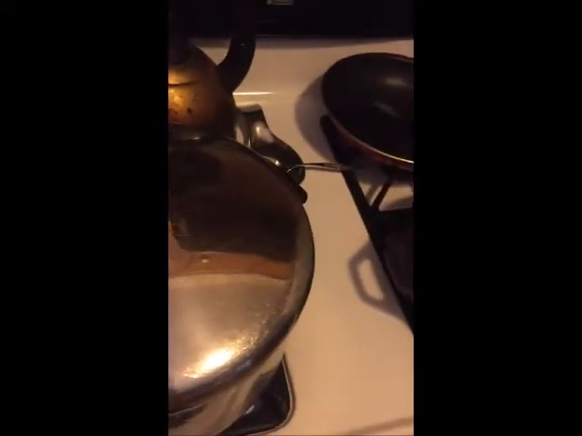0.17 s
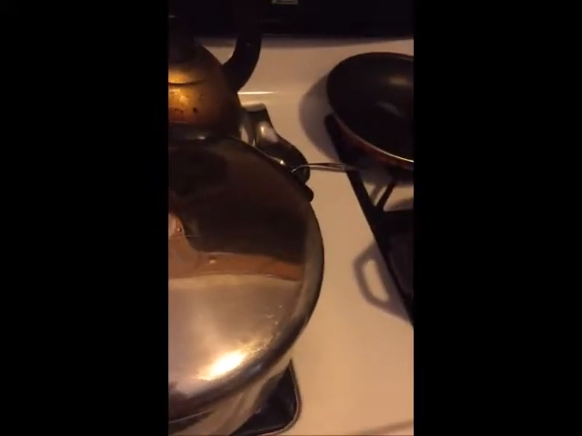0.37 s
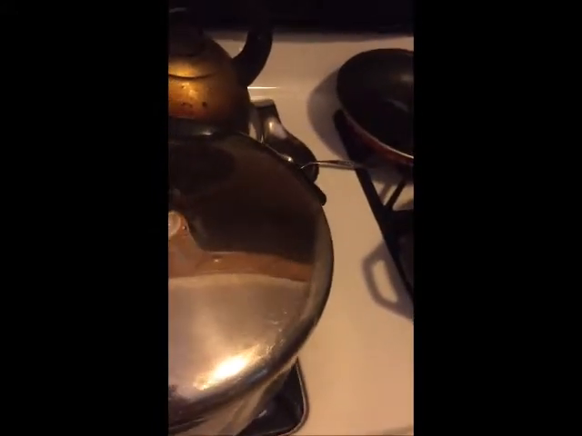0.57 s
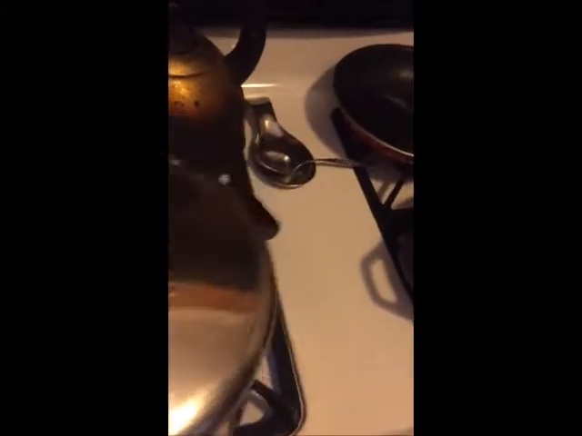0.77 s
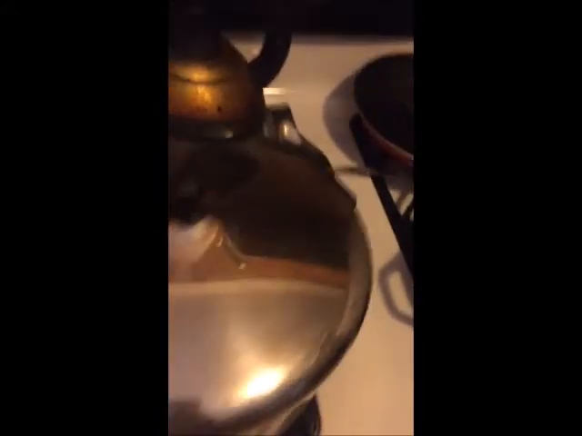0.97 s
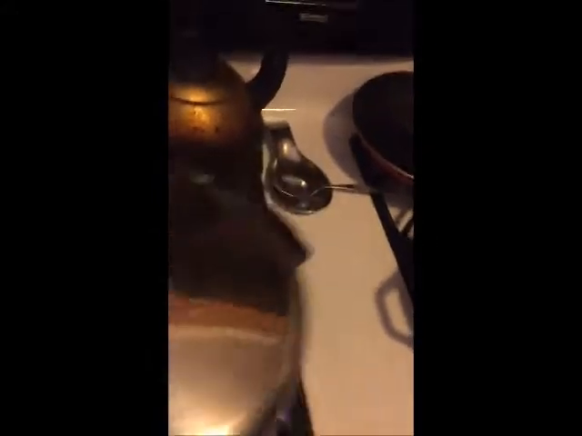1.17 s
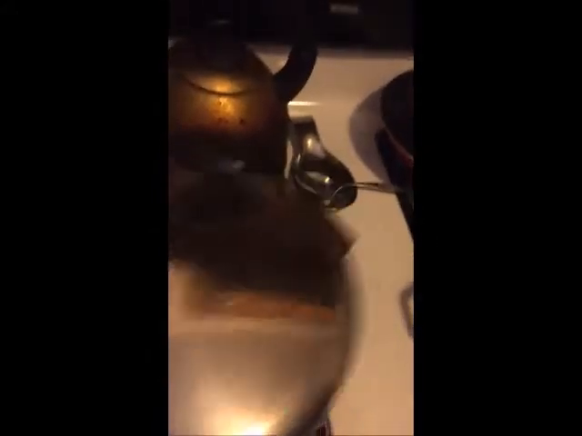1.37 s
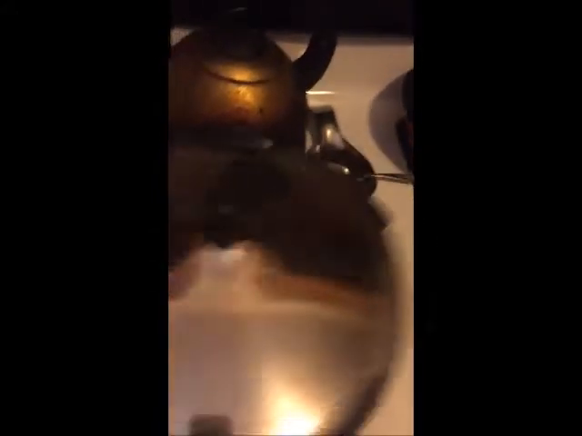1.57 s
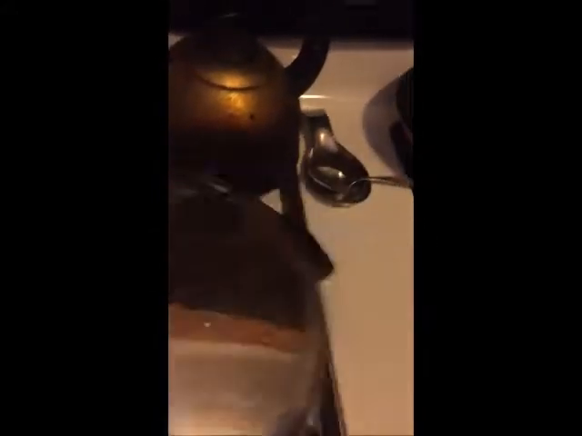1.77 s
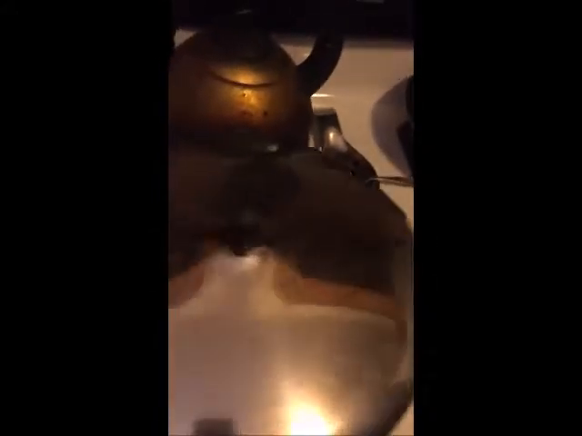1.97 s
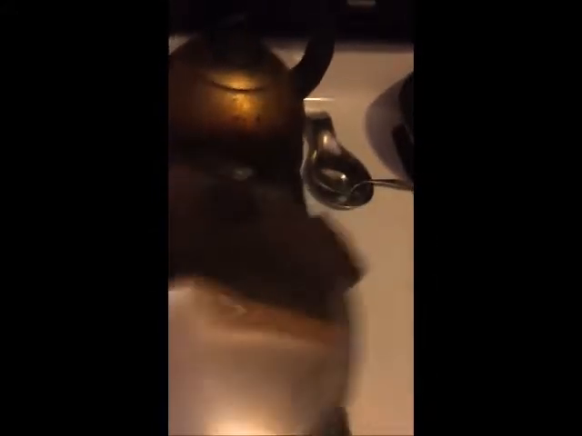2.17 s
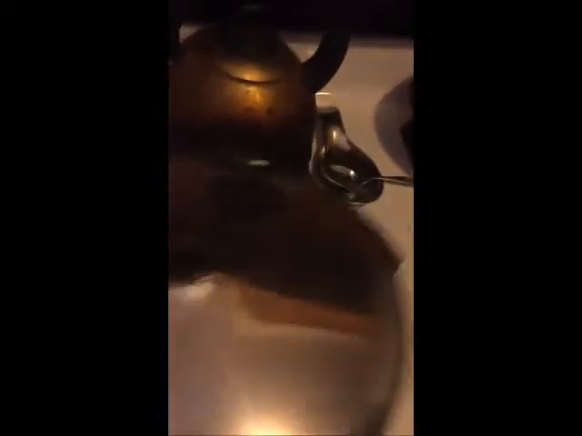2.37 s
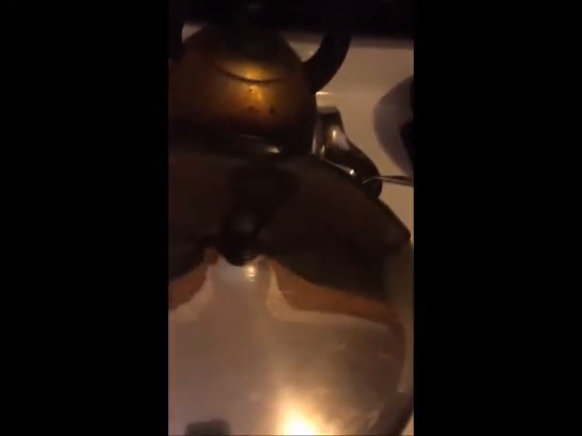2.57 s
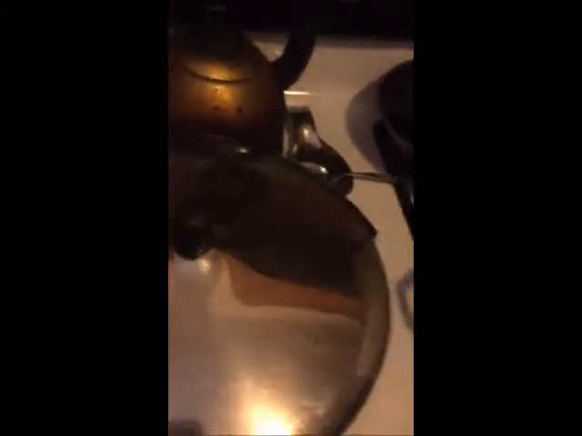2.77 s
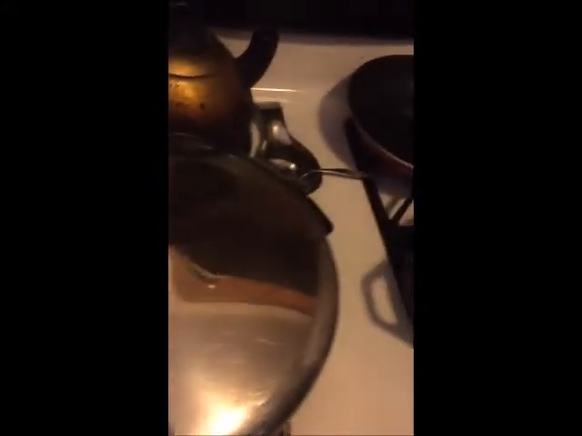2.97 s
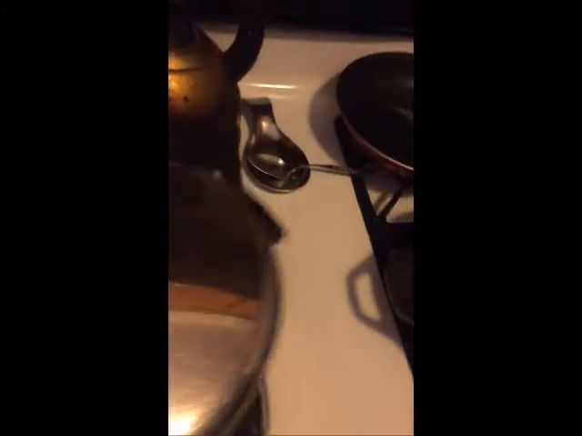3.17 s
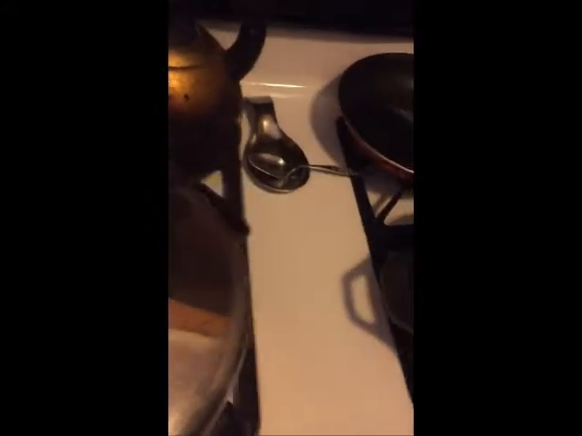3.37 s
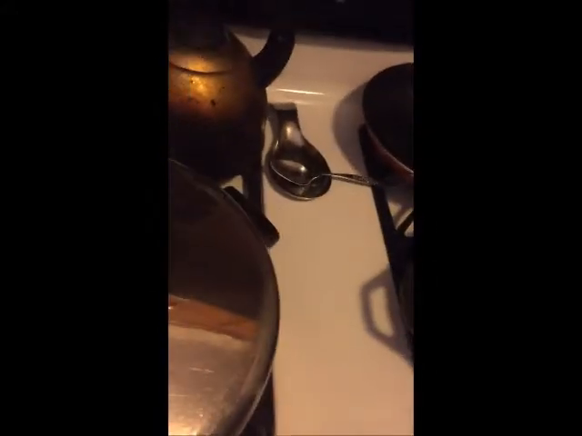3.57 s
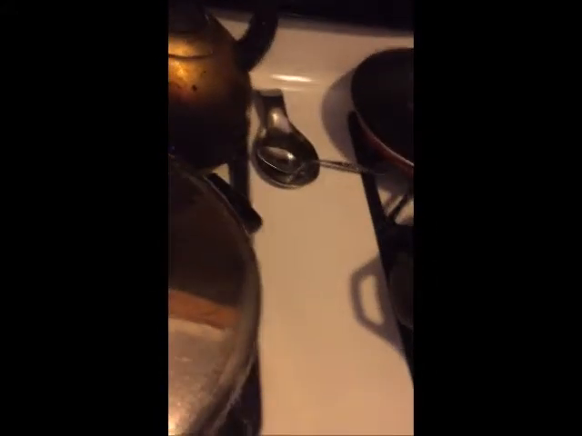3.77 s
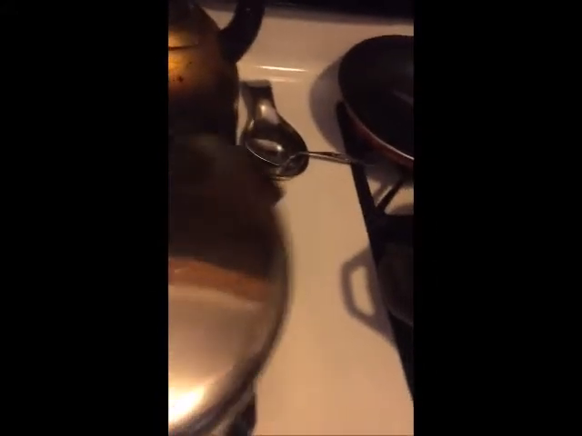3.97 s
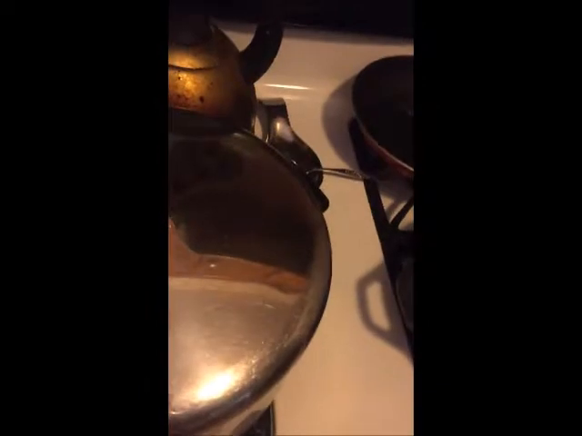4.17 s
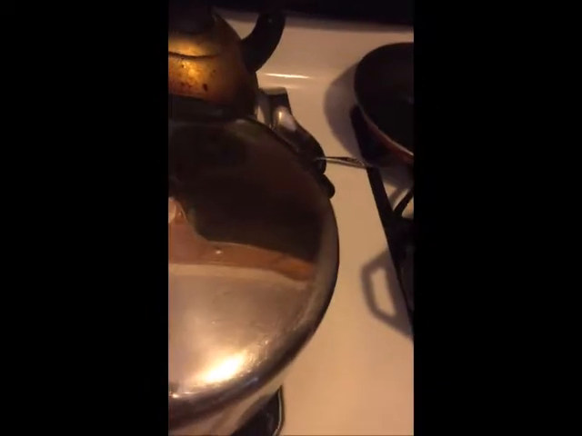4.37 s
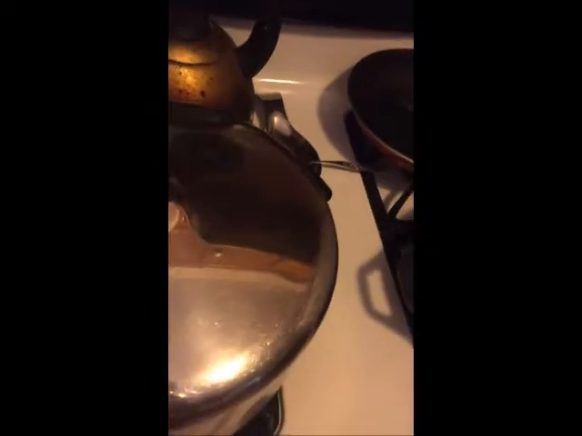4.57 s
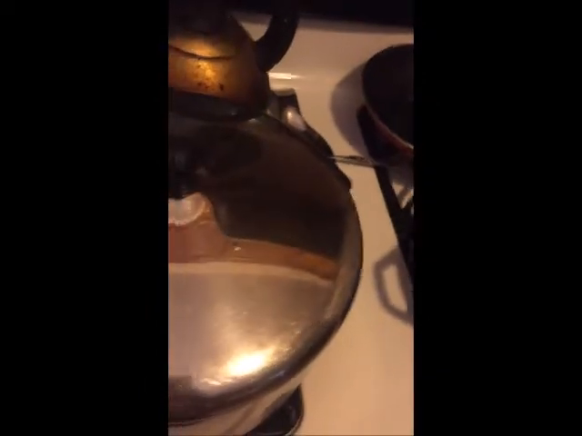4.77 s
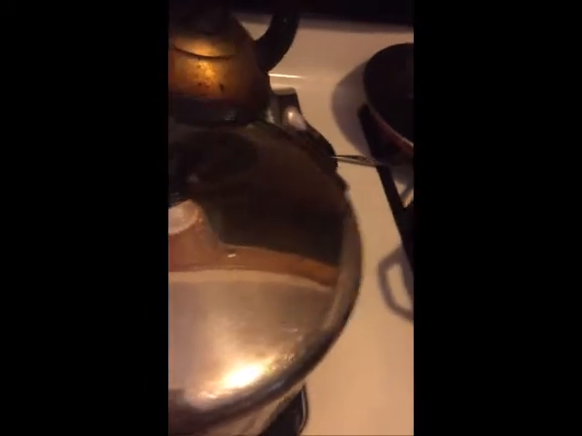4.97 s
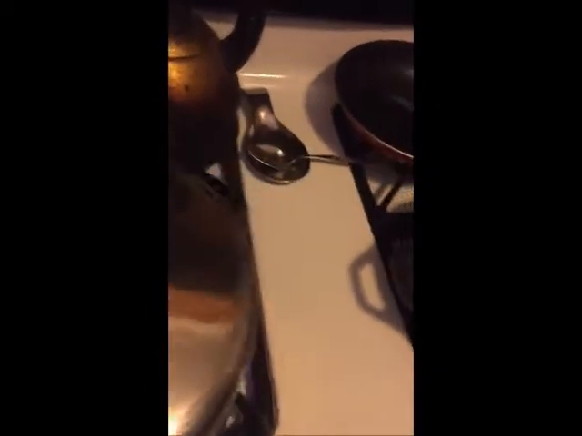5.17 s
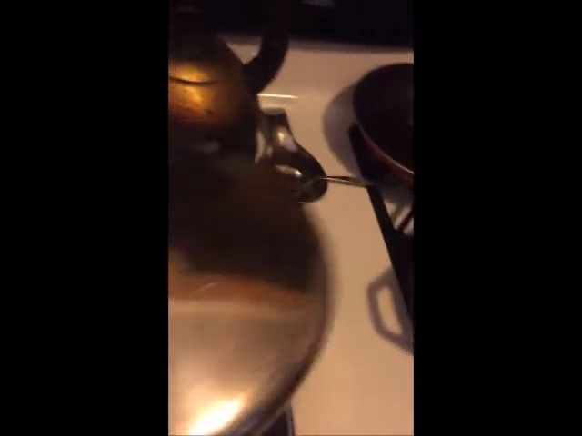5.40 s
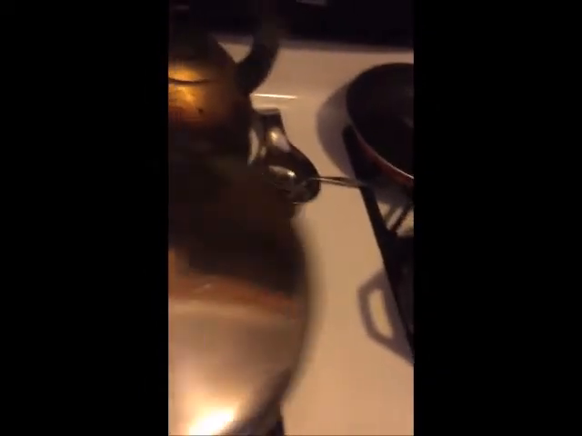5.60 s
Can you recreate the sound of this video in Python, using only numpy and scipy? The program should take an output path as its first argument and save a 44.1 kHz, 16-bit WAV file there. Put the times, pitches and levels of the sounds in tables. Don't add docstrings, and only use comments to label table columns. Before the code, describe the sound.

Popcorn pops softly in a lidded metal pot, then the pot is shaken hard over an iron stove grate with loud metallic rattling.

```python
import sys
import numpy as np
from scipy import signal
from scipy.fft import rfft, irfft
from scipy.io import wavfile
from scipy.ndimage import uniform_filter1d, map_coordinates

SR = 44100
rng = np.random.default_rng(int(sys.argv[2]) if len(sys.argv) > 2 else 0)


def rack_gain(trim_db):
    fader = np.asarray(trim_db, float)
    return 10 ** (fader / 20)


def unload_audio(sound):
    columns = np.transpose(np.atleast_2d(sound))
    steps = np.round(np.clip(columns, -1, 1) * 32767)
    wavfile.write(sys.argv[1], SR, steps.astype(np.int16))


N = 248724
LOW_HZ, HIGH_HZ = 400, 2800
# f/Hz, bandwidth/Hz, level/dB
POT_MODES = [(219, 74, -1), (318.6, 22, -2), (566, 23, -7.5), (709, 59, -6.5), (927, 110, -12),
             (1070, 74, -11), (1333, 93, -8.5), (1633, 34, -10), (1781, 14, 0), (1860, 20, -13),
             (2270, 8.9, -8.5), (2456, 34, -9), (2692, 45, -11), (2880, 55, -11.5), (3245, 64, -10.5),
             (3944, 87, -10.5), (4550, 13, -7), (5300, 73, -10.5), (5840, 62, -6.5), (6350, 10, -9),
             (7830, 57, -17.5), (8460, 380, -20.5), (11380, 640, -24)]


def unit(x):
    return x / np.sqrt(np.mean(x ** 2))


def ring(x, hz, width_hz):
    return signal.lfilter(*signal.iirpeak(hz, hz / max(width_hz, 32.0), fs=SR), x)


def colour(x, points):
    hz, db = np.transpose(points)
    bins_hz = np.arange(2049) * SR / 4096
    cepstrum = irfft(np.log(rack_gain(np.interp(np.log(bins_hz + 1), np.log(hz), db))))
    cepstrum[1:2048] *= 2
    cepstrum[2049:] = 0
    response = irfft(np.exp(rfft(cepstrum)))
    return signal.fftconvolve(x, response)[:len(x)]


def split(x):
    bands = (LOW_HZ, "low"), ([LOW_HZ, HIGH_HZ], "band"), (HIGH_HZ, "high")
    return [signal.sosfilt(signal.butter(3, hz, kind, fs=SR, output="sos"), x) for hz, kind in bands]


def walk(rate, count):
    hold = int(SR / rate)
    held = np.repeat(rng.standard_normal((count, N // hold + 1)), hold, axis=1)[:, :N]
    return 1.49 * uniform_filter1d(uniform_filter1d(held, hold), hold)


def grains(per_s, spread_db, n):
    moment, sign, strength = rng.random((3, n))
    return (moment < per_s / SR) * np.sign(sign - 0.5) * rack_gain(-spread_db * np.log(1 - strength))


def kitchen(x, wet_db, gap_s=0.0029):
    # f/Hz, t60/s
    room_t60 = [(100, 0.24), (1000, 0.24), (12000, 0.25)]
    t = np.arange(SR // 2) / SR
    bands = split(colour(rng.standard_normal(len(t)), [(300, -3.6), (9000, -5.5)]))
    tail = sum(band * np.exp(-np.log(1000) * t / t60) for band, (_, t60) in zip(bands, room_t60))
    tail = tail * (t > gap_s)
    return x + rack_gain(wet_db) * signal.fftconvolve(x, tail / np.sqrt(np.sum(tail ** 2)))[:N]


def metal(force, ring_db, spot_db, detune, damp):
    # f/Hz, level/dB per Hz
    body_points = [(35, -38), (60, -2.5), (179, -13.5), (312, -8), (509, -1.5), (756, 2), (1020, -4.5),
                   (1740, -1), (2100, -6), (5980, -11), (15500, -31.5)]
    rings = 0
    for (hz, width_hz, db), spot, bend in zip(POT_MODES, spot_db, detune):
        rings = rings + rack_gain(db) * ring(force * rack_gain(spot), hz * bend, width_hz * damp)
    return colour(force, body_points) + rack_gain(ring_db) * rings


def rattle(ring_hz, t60, rise_s, per_s, ring_db, edge_hz):
    force = grains(per_s, 2.06, SR // 4)[:int(SR * np.clip(t60 + 0.07, 0.1, 0.25))]
    t = np.arange(len(force)) / SR
    fade = np.log(1000) * t / min(t60, 0.4)
    force = force * (1 - np.exp(-t / rise_s))
    octaves = np.log2(np.array(POT_MODES)[:, 0] / ring_hz)
    scatter, bend = rng.standard_normal((2, len(POT_MODES)))
    spot_db = 9 * np.exp(-(octaves / 0.12) ** 2) + 4 * scatter
    detune = 1 + 0.018 * bend
    damp = 1.9
    soft = np.exp(-2 * np.pi * np.clip(edge_hz, 500, 9000) / SR)
    blow = signal.lfilter([1 - soft], [1, -soft], force * np.exp(-fade))
    bass, body, _ = split(metal(blow, ring_db, spot_db, detune, damp))
    if ring_hz < LOW_HZ:
        bass = ring(bass, ring_hz, 90)
    crack = force * np.exp(-fade / 0.6)
    return bass, body, split(metal(crack, ring_db, spot_db, detune, damp))[2]


def add(track, s, parts):
    at = int(s * SR)
    piece = sum(x / np.abs(x).max() * rack_gain(db) for x, db in parts)[:N - at]
    track[at:at + len(piece)] += piece


def burner():
    # f/Hz, level/dB per Hz
    flame_points = [(15, -46), (25, 24), (195, 8), (405, -28), (734, 7.5), (1610, -33), (1790, -23),
                    (3520, -10.5), (6050, -33), (16000, -31)]
    flutter = rack_gain(1.6 * walk(6.6, count=1)[0])
    return unit(colour(rng.standard_normal(N), flame_points) * flutter) * rack_gain(-47.5)


def chinks():
    # t/s, peak level/dB, f/Hz, t60/s
    touches = [
        (1.4594, -36, 3200, 0.24),
        (4.2444, -43, 4170, 0.04),
        (4.337, -46.5, 4080, 0.08),
        (5.0094, -65, 3700, 0.089),
        (5.1944, -47, 3930, 0.064),
    ]
    out, t = np.zeros(N), np.arange(SR // 4) / SR
    for s, peak_db, hz, t60 in touches:
        swell = (1 - np.exp(-t / 0.0032)) * np.exp(-np.log(1000) * t / t60)
        add(out, s, [(swell * np.sin(2 * np.pi * hz * t), peak_db + 4.0)])
    return out


def drag(size=32):
    # t/s, level/dB
    settling = [(0.0, -48), (0.21, -51), (0.344, -51.5), (0.506, -42.5), (0.646, -45.5), (0.74, -53),
                (2.9, -60), (3.12, -73), (3.7, -43), (3.96, -53.5), (4.04, -59), (4.38, -64),
                (4.508, -42.5), (4.64, -52.5), (4.78, -48), (4.908, -41.5), (5.018, -54.5), (5.64, -63.5)]
    # peak t/s, grind level/dB, rise/s, fade/(dB/s), corn over grind/dB
    hard_strokes = [(0.83, -21.5, 0.088, 40, -6), (1.003, -14.5, 0.035, 134, -5),
                    (1.157, -12, 0.027, 69, -5.5), (1.225, -14.5, 0.068, 159.5, 4.5),
                    (1.336, -11.5, 0.018, 172, 4.5), (1.538, -17.5, 0.054, 86.5, 0),
                    (1.668, -12, 0.014, 118.5, 1), (1.852, -12.5, 0.025, 81.5, -4),
                    (1.9, -12, 0.071, 209.5, -1), (1.994, -15.5, 0.019, 88, 4.6),
                    (2.051, -16.5, 0.041, 238, -2), (2.167, -9, 0.017, 107, -1.5),
                    (2.252, -12.5, 0.015, 93.5, 1.3), (2.385, -20, 0.26, 329, 1.5),
                    (2.492, -13.5, 0.015, 222, -2), (2.561, -10.5, 0.049, 141, -1),
                    (2.658, -18, 0.0098, 81, -5.5), (2.9, -35.5, 0.45, 67.5, 0)]
    # peak t/s, grind level/dB, rise/s, fade/(dB/s), corn over grind/dB
    light_nudges = [(3.21, -33, 0.012, 66, -3), (3.349, -22, 0.027, 92, -4.5),
                    (3.448, -31.5, 0.013, 303, 2.5), (3.533, -24, 0.019, 189.5, 8.5),
                    (4.099, -27, 0.03, 63.5, -12), (4.159, -28, 0.13, 97.5, -1),
                    (5.174, -29, 0.046, 48.5, -7.5), (5.25, -27, 0.12, 68, -4),
                    (5.314, -28, 0.022, 400, -3.5), (5.376, -15, 0.012, 126, -0.1),
                    (5.599, -31, 0.04, 32, 0.5)]
    rise_db, corn_swing = 20, 1.364
    t = np.arange(0, N + size, size) / SR
    s, grind_db, rise_s, fade, corn_db = np.array(hard_strokes + light_nudges).T[:, :, None]
    shape_db = np.where(t < s, rise_db * (t - s) / rise_s, fade * (s - t))
    rest = rack_gain(np.interp(t, *np.transpose(settling)))
    grind = rack_gain(grind_db + shape_db).sum(axis=0)
    corn = rack_gain(grind_db + corn_db + corn_swing * shape_db).sum(axis=0)
    rumble = rack_gain(-6) * grind ** 0.66 * grind / (grind + rest)
    gains = grind + rest, rumble + rack_gain(2) * rest, corn + rack_gain(-8) * rest
    return [uniform_filter1d(np.repeat(g, size)[:N], size=200) for g in gains]


def shake(sharp_hz=7000, brighten=0.77):
    grind_gain, rumble_gain, corn_gain = drag()
    jerks = rack_gain(2.38 * walk(70, count=1)[0])
    force = kitchen(grains(2500, 1.88, N) * jerks, wet_db=-6)
    spread_db = np.clip(np.array(POT_MODES)[:, :1] / 150, 1.5, 4.5)
    spot_db = walk(30, count=len(POT_MODES)) * spread_db
    scrape = metal(force, 1.7, spot_db, np.ones(len(POT_MODES)), 0.97)
    rocking = np.cumsum(1 + 0.012 * walk(14, count=1)[0])
    rumble, grind, corn = split(map_coordinates(scrape, [rocking], mode="mirror"))
    dull = signal.sosfilt(signal.butter(2, sharp_hz, fs=SR, output="sos"), corn)
    sharp = signal.sosfilt(signal.butter(2, sharp_hz, "high", fs=SR, output="sos"), corn)
    corn = unit(dull - sharp * (corn_gain / rack_gain(-8.5)) ** brighten)
    bottom = rack_gain(-4.5) * (unit(rumble) * rumble_gain + unit(grind) * grind_gain)
    return bottom + rack_gain(-8.0) * corn * corn_gain


def knocks():
    # t/s, ring peak level/dB, crack over ring/dB, rattle t60/s
    on_lid = [(0.89, -19, -26, 0.065), (0.931, -11, -15.5, 0.038), (1.151, -3, -5, 0.065),
              (1.204, 5.5, -13, 0.18), (1.277, -4, -11, 0.081), (1.332, 6, -20, 0.094),
              (1.359, -6, -7.5, 0.15), (1.534, -3, -7, 0.21), (1.609, -7, -15, 0.019),
              (1.653, -5.5, -12, 0.084), (1.791, -12, -34.5, 0.086), (1.917, -18.5, -7, 0.11),
              (1.997, 1.5, -17, 0.021), (2.044, -7, -20, 0.048), (2.245, 4.5, -11, 0.21),
              (2.322, 0, -17, 0.25), (2.558, -1, -16, 0.21), (2.651, -5, -14, 0.12),
              (2.798, -16.5, -29, 0.041), (3.36, -25, -10, 0.09), (3.45, -30, -22, 0.026),
              (3.862, -18, -25, 0.13), (5.218, -17.5, -17, 0.078), (5.241, -12.5, -29, 0.17),
              (5.311, -6.5, -13.5, 0.042), (5.362, -2, -15, 0.086), (5.424, -22, -12, 0.17)]
    on_wall = [(1.666, -0.5, -8.5, 0.19), (3.518, -28, -28, 0.076), (5.158, -23, -38, 0.32),
               (5.328, -19, -19, 0.043), (5.372, 3, -10.5, 0.09), (5.388, -1.5, -9, 0.08)]
    on_grate = [(0.337, -24, -48, 0.067), (0.425, -32, -9, 0.11), (0.588, -23, -50, 0.073),
                (0.777, -31, -33, 0.12), (0.816, -21, -2, 0.18), (1.001, -8, 1.5, 0.16),
                (1.105, -26, 4, 0.096), (1.179, -4.5, -30, 0.023), (1.498, -4.5, -8.5, 0.072),
                (1.853, -10.5, 2, 0.63), (1.982, -3.5, -15.5, 0.052), (2.157, -1.5, -21, 0.13),
                (2.474, -6.5, -15, 0.15), (3.224, -20.5, -35, 0.23), (3.339, -6, -37, 0.18),
                (4.133, -16, -14, 0.14), (4.158, -13.5, -22, 0.072), (4.206, -12.5, -18, 0.2),
                (4.834, -16, -30, 0.13), (4.97, -28, -24.5, 0.15), (5.19, -15, -20, 0.08),
                (5.579, -12, -34, 0.053), (5.599, -14, -22, 0.41)]
    on_rim = [(0.978, -8, -23, 0.037), (1.838, -1, -20, 0.078), (3.527, -2, -17, 0.065),
              (3.545, -6, -24, 0.058), (4.088, -20, -33, 0.21)]
    on_belly = [
        (4.086, -26, -23, 0.19),
        (4.112, -16.5, -23, 0.1),
        (4.145, -38, -23, 0.14),
    ]
    # knocks, loudest ring f/Hz, bass peak level/dB of a knock at 0 dB
    spots = [(on_lid, 1826, -12), (on_wall, 880, -19.5), (on_grate, 720, -12.5),
             (on_rim, 1250, -22), (on_belly, 387, -3)]
    out = np.zeros(N)
    for rows, ring_hz, bass_db in spots:
        for s, ring_db, crack_db, t60 in rows:
            edge_hz = 6000 * rack_gain(1.1 * crack_db + 11.0)
            bass, body, crack = rattle(ring_hz, t60, 0.0014, 9000, 15.0, edge_hz)
            add(out, s - 0.001, [(bass, bass_db + 0.8 * ring_db), (body, ring_db - 4.5),
                                 (crack, ring_db + crack_db - 2.0)])
    return kitchen(out, wet_db=-5.0)


def pops(air_hz=170, air_width_hz=70):
    # t/s, ring peak level/dB, thump over ring/dB, crack over ring/dB
    at_lid = [(0.122, -34, -24, -21), (0.245, -23, -8.5, -9), (0.474, -17.5, -7.5, -11),
              (0.518, -17, -2.5, -10), (0.548, -48, -5, 13), (0.715, -17.5, -3.5, -18.5),
              (2.97, -16.5, -8, 2), (3.724, -22, -2.5, -5), (3.956, -34, -13, -37), (4.457, -15, -8, -15.5),
              (4.518, -28, 3, -5), (4.562, -28, -3, -6), (4.575, -12, -6.5, -19.5),
              (4.686, -33, -14, -11.5), (4.82, -10.5, -10, -18), (4.912, -19.5, -12, -11)]
    at_wall = [(0.659, -21.5, -5, -12), (2.943, -18, 1, -6.5), (4.009, -23.5, -6.5, -12),
               (4.049, -19.5, -7, -16), (4.279, -26.5, -16, -5), (4.393, -13.5, -5, -15.5),
               (4.603, -46, 2, 6), (4.635, -14.5, -7, -16.5)]
    at_bottom = [(0.033, -33.5, -9, -7), (0.078, -18, -1, -16.5), (0.143, -31, -19, -22),
                 (0.634, -42, 9.5, -19), (2.847, -11, -7, -32), (2.902, -18, 3.5, -10),
                 (3.173, -28.5, -13, -5.5), (3.195, -16.5, -1.5, -10.5), (3.264, -34, -14, -2),
                 (3.766, -22, -2, -15.5), (4.429, -25.5, 2.5, -14)]
    # bursts, loudest ring f/Hz, patter t60/s
    spots = [(at_lid, 1820, 0.057), (at_wall, 1090, 0.096), (at_bottom, 640, 0.1)]
    thumps, patter = np.zeros((2, N))
    for rows, ring_hz, t60 in spots:
        for s, ring_db, thump_db, crack_db in rows:
            _, body, crack = rattle(ring_hz, t60, 0.0016, 14000, 18.0, 3000)
            crack = signal.lfilter([1, -0.6], 1, crack)
            hz = air_hz * (1 + 0.029 * rng.standard_normal())
            puff = -ring(ring(signal.unit_impulse(SR // 8), hz, air_width_hz), hz, air_width_hz)
            add(thumps, s - 0.001, [(split(puff)[0], ring_db + thump_db)])
            add(patter, s - 0.001, [(body, ring_db - 7.5), (crack, ring_db + crack_db + 4.5)])
    return kitchen(thumps, wet_db=-13.5) + kitchen(patter, wet_db=-10.0)


def scene():
    return (burner() + chinks() + shake() + knocks() + pops())[None]


def roll_off(x):
    return signal.sosfilt(signal.butter(12, 16460, fs=SR, output="sos"), x)


def record(dry):
    band = signal.sosfilt(signal.butter(3, 52, "high", fs=SR, output="sos"), dry)
    rounded = np.tanh(0.8 * band) / 0.8
    band = signal.sosfilt(signal.ellip(8, 0.2, 60, 15850, fs=SR, output="sos"), rounded)
    mix = np.clip(band, -1, 1)
    return roll_off(mix)


dry = scene()
out = record(dry)
unload_audio(out)
```